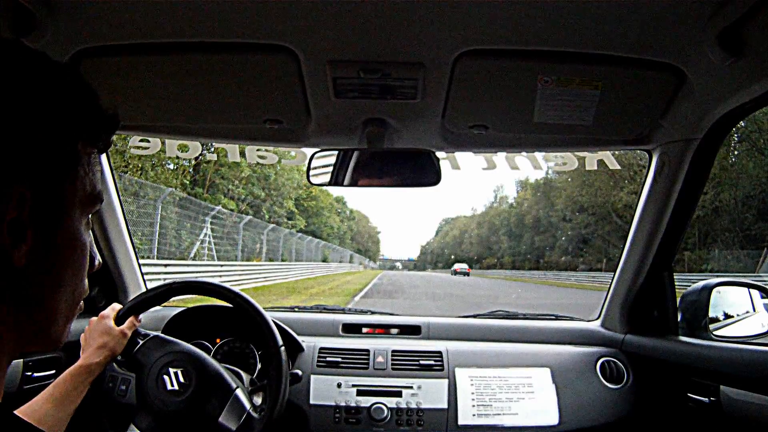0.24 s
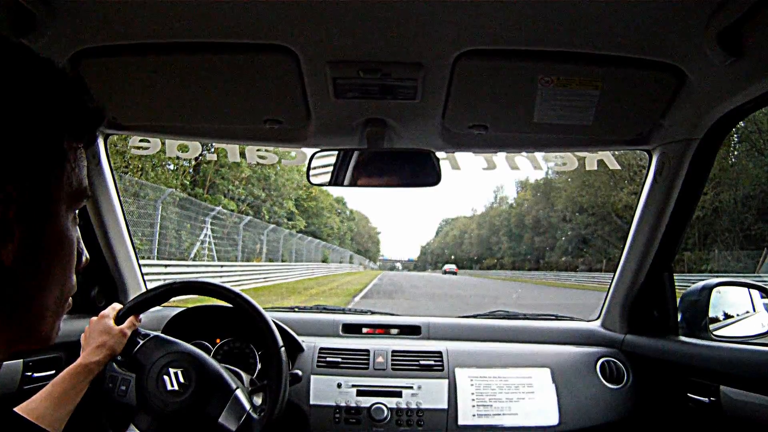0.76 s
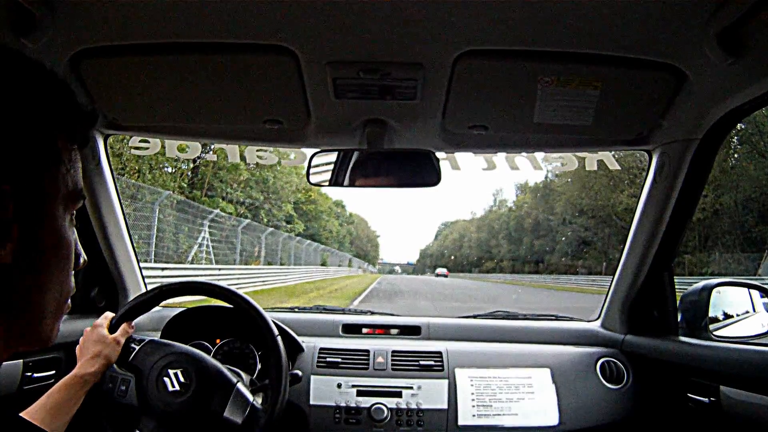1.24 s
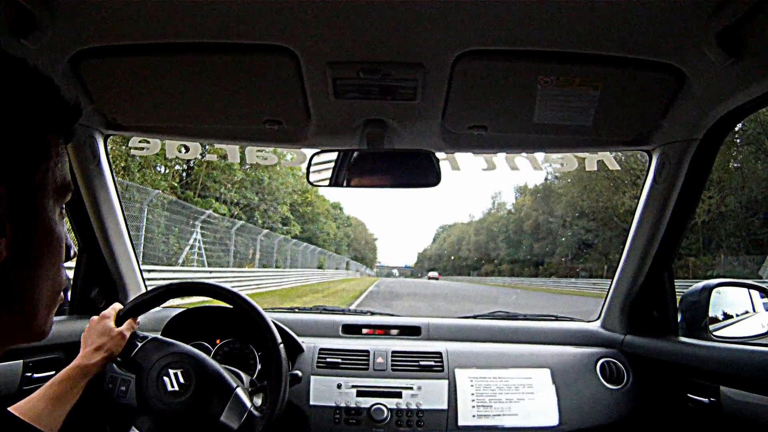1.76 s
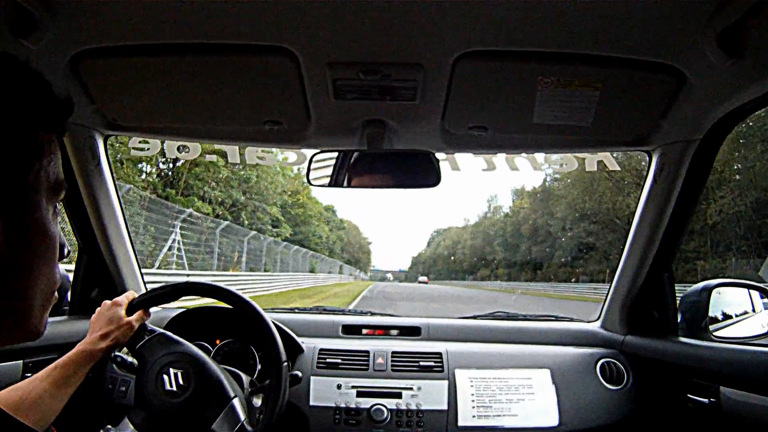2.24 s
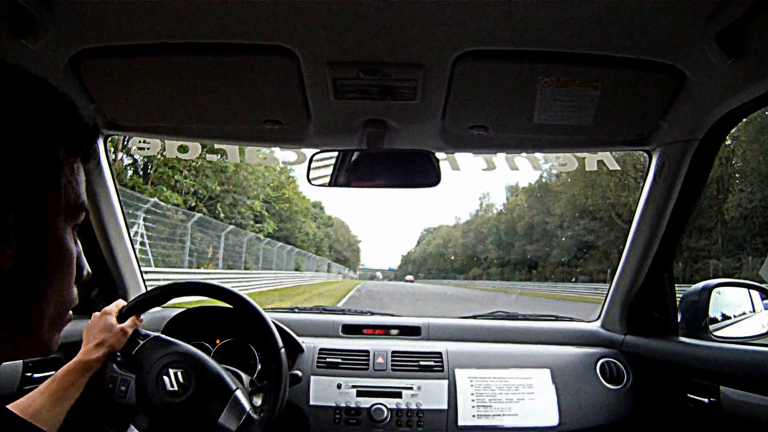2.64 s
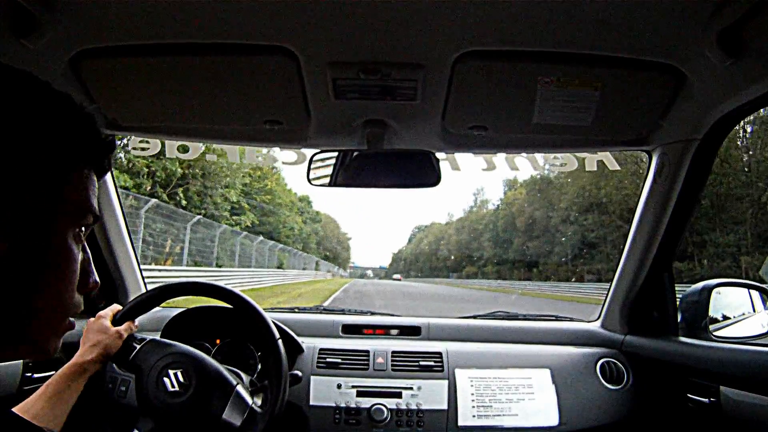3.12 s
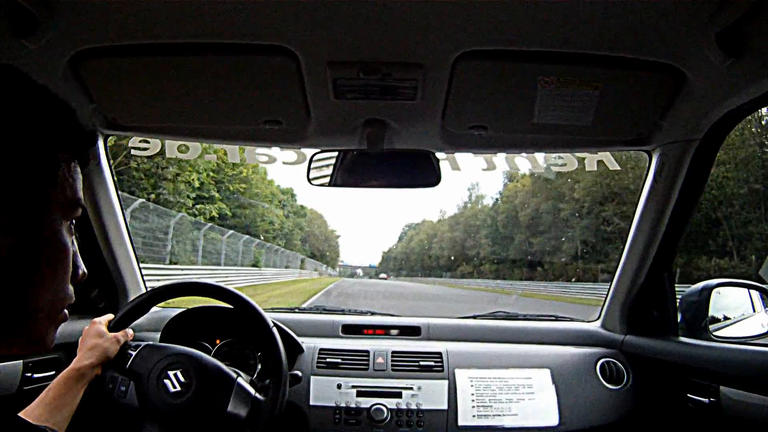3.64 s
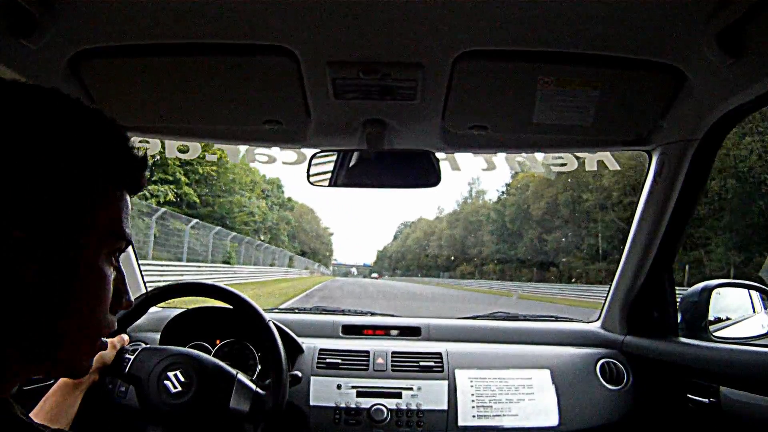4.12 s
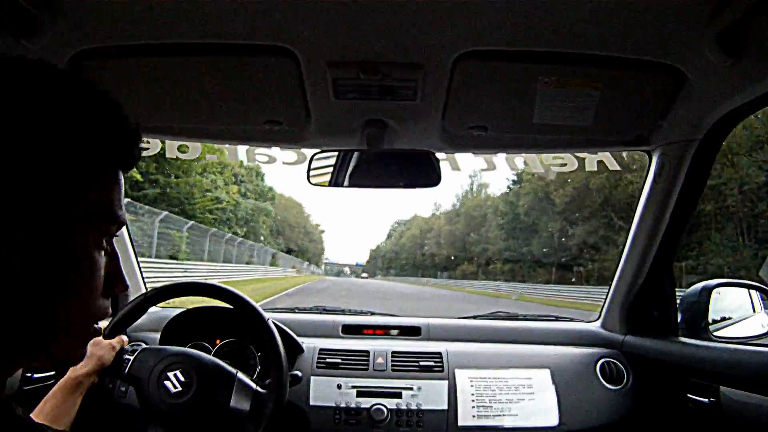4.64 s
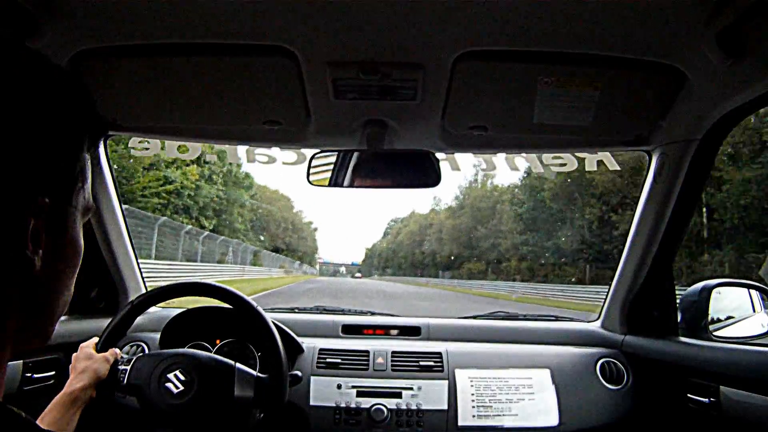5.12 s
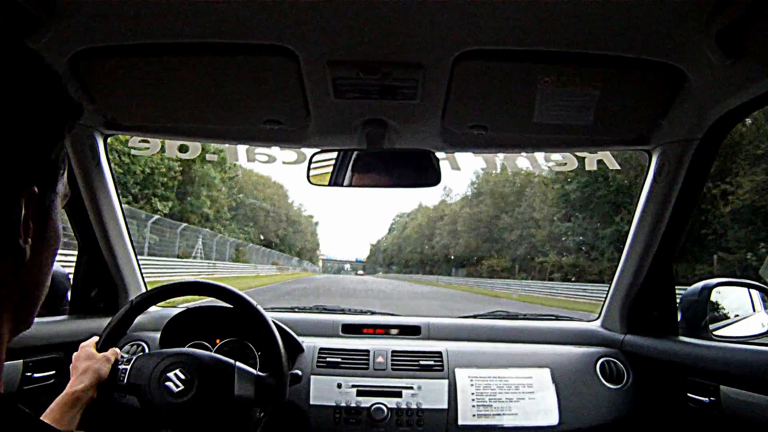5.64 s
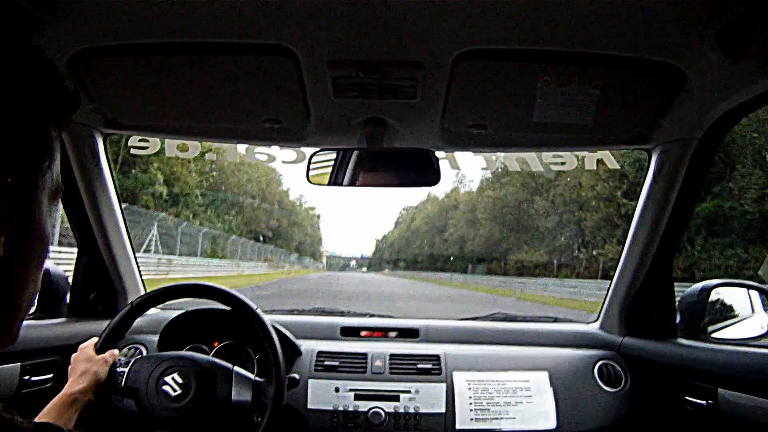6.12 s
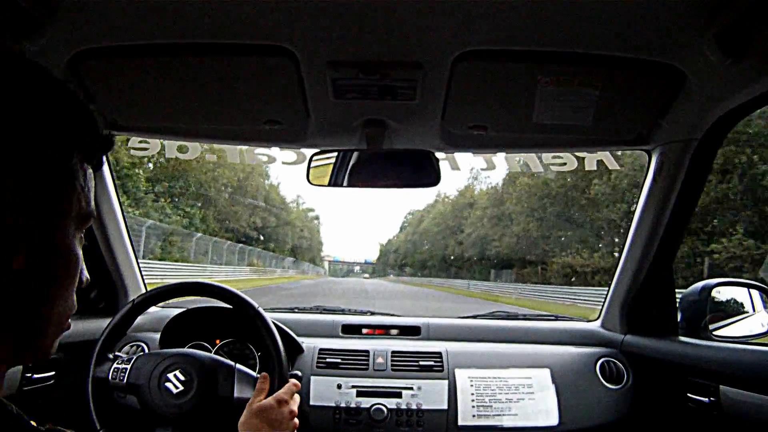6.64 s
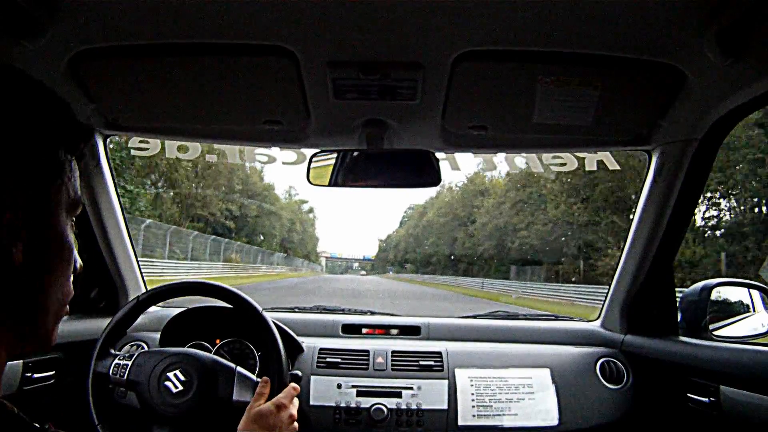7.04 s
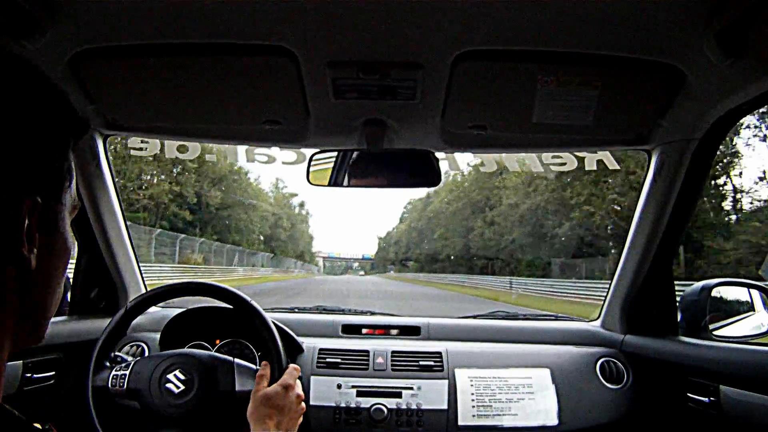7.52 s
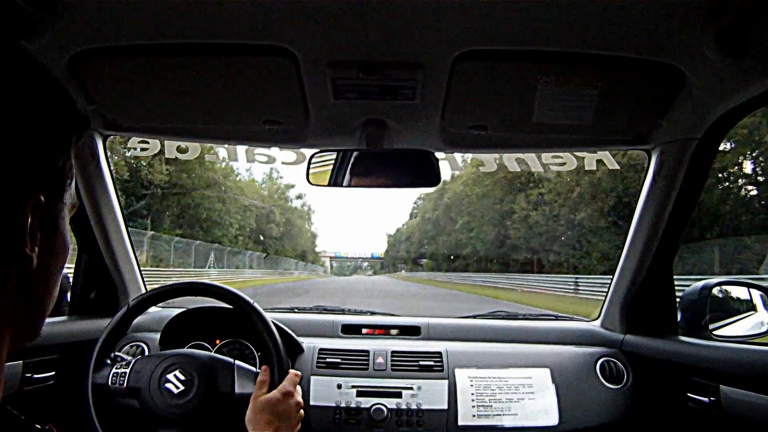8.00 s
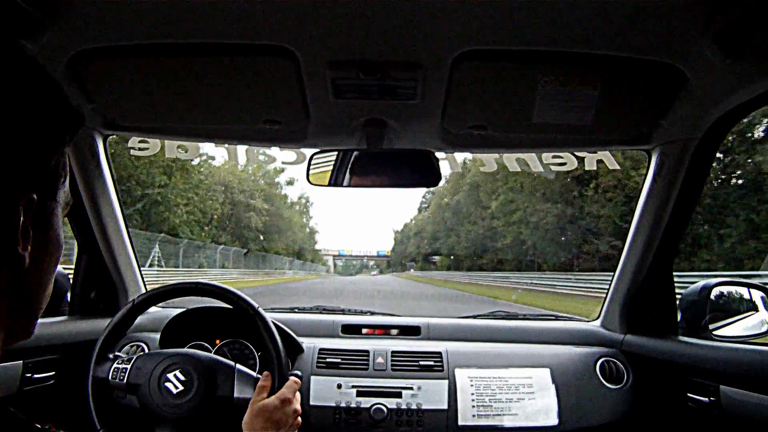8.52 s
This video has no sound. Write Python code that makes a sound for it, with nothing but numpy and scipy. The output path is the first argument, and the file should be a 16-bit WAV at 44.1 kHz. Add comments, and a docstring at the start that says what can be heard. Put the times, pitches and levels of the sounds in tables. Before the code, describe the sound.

From behind the front seats of a small car, a low idle is joined by dull knocks and two light pings. The engine revs up, dips for a moment, then accelerates in a long rising growl with rushing air and a slightly gritty edge. An upshift brings a clunk, clicks and a sudden fall in pitch before the revs build again more slowly. Uneven road rumble fills the closed cabin throughout.

```python
"""Inside a small four-cylinder car. First it idles, the controls thump and something small pings twice.
After a second it pulls away, the trim clicks, and the revs sag as the clutch bites. They climb until
5.7 s; near 6.3 s the car shifts up with a clunk, then pulls again. All along, the engine's firing note,
growl, rush of air and rasp swell and fade as the revs pass pitches at which the cabin rings, and the
road rumbles below. Holding each sample at a low rate adds a gritty treble."""
import sys
import numpy as np
from scipy import signal
from scipy.fft import rfft, irfft, next_fast_len
from scipy.io import wavfile
from scipy.ndimage import map_coordinates

SR = 44100
rng = np.random.default_rng(int(sys.argv[2]) if len(sys.argv) > 2 else 0)


def materialize(psi):
    """Save the field psi as 16-bit PCM at rate SR to the path in sys.argv[1].

    A 1-D psi becomes a single channel; in a 2-D psi each row is a channel.
    """
    bounded = np.clip(np.atleast_2d(psi).T, -1, 1)
    quanta = np.round(bounded * 32767).astype(np.int16)
    wavfile.write(sys.argv[1], SR, quanta)


N = 386757

# How often the cylinders fire, twice for each turn of the crankshaft: t/s, f/Hz
FIRING_RATE = [(0.0, 22.73), (1.07, 24.36), (1.65, 80), (2.01, 103.8), (2.2, 106.2), (2.38, 103.2),
               (2.8, 81.9), (3.01, 97.85), (3.75, 133.9), (4.92, 204.9), (5.21, 220.4), (5.67, 245.6),
               (5.9, 241.5), (6.17, 226.8), (6.3, 224.4), (6.4, 191.2), (6.58, 156.5), (6.7, 158.7),
               (7.77, 185.43), (8.77, 206.5)]
# How far the gas pedal is down: t/s, throttle/0-1
THROTTLE = [(0, 0), (.95, 0.21), (1.5, 0.42), (2.05, 0.73), (2.4, 0.72), (2.85, 0.84), (3.2, 0.9),
            (5.86, 0.95), (6.05, 0.51), (6.33, 0.73), (6.38, 0.02), (6.8, 0.74), (8.77, 0.79)]
# How loudly the cabin carries the firing note at full throttle: f/Hz, level/dB
NOTE_LEVEL = [(23, -25), (26, -5.5), (35, -9.5), (50, -11.5), (68, -9), (82, -18), (98, -17.5),
              (175, -13.5), (210, -11), (245, -17.5)]
# Firing rates at which the note cancels where the listener sits: f/Hz, width/Hz, level/dB
NOTE_DEAD_SPOTS = [(59.1, 6.2, -17.5), (130.5, 6.9, -7), (190.4, 3, -9.5), (204.1, 4.3, -8),
                   (217.8, 2.9, -11.5), (244, 1.9, -7.5)]
# The octave above the note, which turns slow firings into thuds: firing f/Hz, relative level/dB
THUD_OVERTONE = [(23, -25.5), (35, -7.5), (55, -12), (70, -17), (90, -25)]
# How well sound gets through the wall between engine and cabin: f/Hz, level/dB
ENGINE_WALL = [(20, -26), (60, -11.5), (100, -6), (130, 0.5), (260, -1), (390, -1), (550, -1.5), (700, -2),
               (810, -9.5), (1100, -11.5), (1350, -15), (2200, -32), (3000, -32)]
# Pitches at which the cabin rings: f/Hz, width/Hz, level/dB
CABIN_RESONANCES = [(175, 22, 2.5), (205, 21, 6.5), (294, 15, 3.5), (350, 41, 6.5), (389, 24, 6),
                    (447, 29, 6), (516, 33, 10), (607, 30, 4), (668, 34, 8.5), (723, 18, 7.5), (860, 34, 4),
                    (1075, 50, 4), (2015, 27, 6), (2203, 36, 8), (2662, 21, 7)]
# An "order" is a tone at a multiple of the crank's speed. Each takes its own route to the cabin,
# with its own peaks and notches: order, f/Hz, width/Hz, level/dB
ORDER_PEAKS = [(1, 95, 30, -9), (3, 260, 80, -4), (3, 358, 40, 8), (4, 208, 10, 4), (4, 282, 30, 11),
               (4, 330, 70, -10), (4, 432, 15, -9), (4, 468, 30, 5), (4.5, 439, 25, 6), (5, 333, 40, 7),
               (5, 450, 50, -6), (5.5, 490, 70, 9), (5.5, 600, 70, -4), (6, 305, 20, 10), (6, 460, 50, -6),
               (6, 515, 20, 3), (6, 550, 20, -6), (6, 620, 25, 8), (6.5, 554, 20, 10), (7, 360, 20, 10),
               (8, 290, 60, 5), (8, 730, 50, -9), (12, 503, 24, 12), (12, 590, 25, 7), (12, 645, 30, 6),
               (12, 735, 40, 6), (12, 1050, 200, -5)]
# Firing rates at which the engine runs harsher or smoother: f/Hz, width/Hz, relative level/dB
HARSHNESS = [(130.6, 18, 1.5), (154.6, 9, -2), (170.3, 6.38, 1.5), (182.4, 4.4, -1.5), (191.86, 2.667, 3.5),
             (210.2, 7.7, 2.5), (214.4, 7.9, -6), (218, 8.6, 3), (246.8, 5.2, 2.5)]
# Tone colour of the air being sucked in: f/Hz, level/dB
INTAKE_COLOUR = [(40, -33), (90, -9.5), (130, 2.5), (200, 4.5), (280, 0.5), (400, -3.5), (550, -1),
                 (690, -6), (800, -12.5), (1150, -21.5), (1500, -15), (2500, -47)]
# Tone colour of the valves' hiss: f/Hz, level/dB
VALVE_COLOUR = [(590, -30), (1000, -5.5), (1050, -2.5), (1180, -2.5), (1320, -12), (1480, -12), (1780, -12),
                (2150, -6.5), (2490, -10.5), (2960, -5), (3640, -18.5), (4940, -18.5), (5900, -27.5),
                (7670, -71), (13000, -120)]
# Whine of the timing drive, which turns the camshaft: order, relative level/dB
WHINE_ORDERS = [(16.5, -21), (18, -12.5), (19, -24), (22, -13), (24, -17)]
# Brief dips in the level just after two jolts, most in the treble: t/s, strength (more negative is deeper)
JOLT_DIPS = [(1.205, -3), (6.355, -22.5)]
# Dull knocks of pedals, gear lever and drivetrain: t/s, peak level/dB, f/Hz, time to fade 60 dB/s
THUMPS = [(0.061, -19, 160, 0.19), (0.089, -18.5, 170, 0.054), (.535, -24, 155, 0.19),
          (0.569, -23.5, 154, 0.16), (0.628, -22.5, 196, 0.039), (0.66, -21, 232, 0.015),
          (0.684, -20.5, 62.5, 0.28), (0.725, -23, 160, 0.079), (6.306, -11.5, 93.1, 0.06),
          (6.313, -21, 834, 0.037), (6.322, -7, 43.7, 0.15), (6.356, -13, 21.77, 0.3)]
# Clicks of trim and gear linkage: t/s, peak level/dB, relative level of the crack/dB
CLICKS = [(1.1714, -36, 0), (1.1987, -35, 8), (2.9255, -18.5, -2), (2.9348, -20.5, -7), (3.3832, -29, 0),
          (6.1814, -18, 2), (6.3136, -8, -11), (6.3352, -12.5, 1), (6.3455, -19, -10), (6.4393, -34, 0),
          (6.6238, -30, 5)]
# Tones of the clicking plastic: f/Hz, level/dB, time to fade 60 dB/s
PLASTIC_MODES = [(1740, -6.5, 0.013), (2450, 9, 0.005), (2640, -9, 0.073), (2900, 4.5, 0.018),
                 (4860, -18, 0.061)]
# Two bright pings: t/s, peak level/dB
PINGS = [(0.646, -21), (.951, -20.5)]
# Tones of the small hard thing that pings: f/Hz, level/dB, time to fade 60 dB/s
PING_MODES = [(2160, -10, 0.083), (2400, -13.5, 0.11), (2530, -18, 0.061), (2880, 0.5, 0.2),
              (2880, -3, 0.084), (3330, -21, 0.22), (3190, 3.5, 0.11), (3040, -2.5, .11),
              (3520, -30, 0.075), (3920, -25, 0.11)]
# How hard the road shakes the body: t/s, relative level/dB
ROAD_SHAKE = [(0, -29), (1, -29.5), (2.1, -29.5), (2.68, -23.5), (2.95, -25), (4.1, -20), (4.8, -28.5),
              (6.2, -24), (7.4, -23.5), (8.2, -22.5), (8.77, -23)]
# Tone colour of that shaking: f/Hz, level/dB
ROAD_COLOUR = [(8, -19.5), (18, -16), (28, 3.5), (40, -11.5), (55, -14), (80, -21), (150, -21), (300, -59)]


def firing_note(crank, crank_hz, throttle, load_db=10, third_harmonic_db=-6):
    """Two firings a turn make the main note; at low revs it sharpens into separate thuds."""
    firing_hz, angle = 2 * crank_hz, 2 * crank
    level_db = along(NOTE_LEVEL, firing_hz) + load_db * (throttle - 1)
    level_db += 1.5 * wobble(25) + 0.14 * wobble(5.7) + 0.38 * dips_db()
    note = amp(peaks(NOTE_DEAD_SPOTS, firing_hz)) * np.cos(angle)
    overtones = np.cos(2 * angle) + amp(third_harmonic_db) * np.cos(3 * angle)
    thud = amp(along(THUD_OVERTONE, firing_hz)) * overtones
    return np.sqrt(2) * amp(level_db) * (note + thud)


def cylinder_growl(crank, crank_hz, throttle, gain_db=-37, load_db=17, tilt_db=-2.5, uneven_db=3.5):
    """Unequal cylinders sound every half order; each swells with throttle and where the cabin rings."""
    grid_hz = np.arange(SR // 8)
    path_db = along(ENGINE_WALL, grid_hz) + cabin_db(grid_hz)
    twisted = crank + .016 * wobble(70)  # uneven burning twists the crank and roughens high orders
    growl = np.zeros(N)
    for order in np.arange(2, 28) / 2:
        if order != 2:  # order 2 is the firing note
            route_db = peaks([row[1:] for row in ORDER_PEAKS if row[0] == order], grid_hz)
            # Whole orders are a little stronger, even ones much stronger.
            source_db = tilt_db * np.log2(order) + (order % 1 == 0) + 5.5 * (order % 2 == 0)
            heard_db = np.take(path_db + route_db, (order * crank_hz).astype(int), mode="clip")
            growl += amp(source_db + heard_db + uneven_db * wobble(8)) * tone(order * twisted)
    revs_db = 4 * np.log2(crank_hz / 60) + .8 * peaks(HARSHNESS, 2 * crank_hz)
    return amp(gain_db + load_db * (throttle - 1) + revs_db) * growl


def intake_rush(crank, crank_hz, throttle, gulp=0.23, gain_db=-43.5):
    """The engine gulps air once a firing, and the rush makes the cabin ring."""
    air = noise(lambda hz: along(INTAKE_COLOUR, hz) + 0.84 * cabin_db(hz))
    pulse = 1 + gulp * np.cos(2 * crank) + 0.13 * np.cos(crank / 2)
    drive_db = effort_db(crank_hz, throttle, revs_db=4.5, load_db=9, harsh=0.99)
    return amp(gain_db + drive_db + .5 * dips_db() + wobble(12)) * unit(air * pulse)


def valve_rasp(crank, crank_hz, throttle, gain_db=-58, whine_db_per_octave=17):
    """Metallic hiss pulses with each firing and camshaft turn; the timing drive whines at high revs."""
    hiss = noise(lambda hz: along(VALVE_COLOUR, hz) + 0.2 * cabin_db(hz))
    pulse = np.exp(0.03 * np.cos(2 * crank) + 0.046 * np.cos(crank / 2))
    rasp = unit(hiss * pulse)
    grid_hz = np.arange(SR // 8)
    lift_db = cabin_db(grid_hz)
    rise_db = whine_db_per_octave * np.log2(crank_hz / 120)
    for order, db in WHINE_ORDERS:
        ringing_db = np.interp(order * crank_hz, grid_hz, lift_db)
        rasp += amp(db + rise_db + ringing_db + 3.2 * wobble(14)) * tone(order * crank)
    drive_db = effort_db(crank_hz, throttle, revs_db=7.5, load_db=7, harsh=1.11)
    return amp(gain_db + drive_db + dips_db() + 1.13 * wobble(22)) * unit(rasp)


def effort_db(crank_hz, throttle, revs_db, load_db, harsh):
    """Engine noise grows with revs and throttle, and peaks at the harsh speeds."""
    return revs_db * crank_hz / 50 + load_db * throttle + harsh * peaks(HARSHNESS, 2 * crank_hz)


def dips_db(fall_s=.004, recovery_s=0.052):
    """The level drops quickly after a jolt and soon comes back."""
    total_db = np.zeros(N)
    for start, strength in JOLT_DIPS:
        age = np.maximum(np.arange(N) / SR - start, 0)
        total_db += strength * (1 - np.exp(-age / fall_s)) * np.exp(-age / recovery_s)
    return total_db


def cabin_db(hz):
    """The boost the cabin gives to pitches at which it rings."""
    return peaks(CABIN_RESONANCES, hz)


def control_thumps(t, rise_s=0.0013):
    """Pedals, lever and drivetrain knock: each is one dying tone with a little dull noise."""
    track = np.zeros(N)
    for start, db, hz, fade_s in THUMPS:
        body = np.sin(2 * np.pi * hz * t) + 0.094 * burst(t, 4, 620)
        add(track, start, body * 1000 ** (-t / fade_s) * (1 - np.exp(-t / rise_s)), db)
    return track


def trim_clicks(t, crack_s=0.0034):
    """Plastic gives a sharp crack and rings for a moment."""
    track = np.zeros(N)
    for start, db, crack_db in CLICKS:
        body = ring(PLASTIC_MODES, t)
        crack = amp(crack_db) * np.exp(-t / crack_s) * burst(t, 1, [3600, 5800], "band")
        add(track, start, body + crack, db)
    return track


def pings(t, rise_s=0.00073, tick_s=0.0069):
    """Something small and hard ticks, rings with a rattle and echoes round the cabin."""
    track = np.zeros(N)
    for start, db in PINGS:
        rattle = 1 + .5 * burst(t, 2, 160)
        body = rattle * ring(PING_MODES, t)
        tick = 0.21 * np.exp(-t / tick_s) * burst(t, 2, [1800, 5800], "band")
        ping = (body + tick) * (1 - np.exp(-t / rise_s))
        add(track, start, signal.fftconvolve(ping, cabin_echoes(t)), db)
    return track


def cabin_echoes(t, strength=0.9, fade_s=0.26, count=90):
    """Sound arrives directly, then bounces off the glass and trim."""
    echo = np.zeros(len(t))
    echo[rng.integers(SR // 400, SR // 14, count)] = rng.standard_normal(count)
    echo *= 1000 ** (-t / fade_s)
    return (t == 0) + strength * echo / np.linalg.norm(echo)


def road_rumble(gain_db=-1):
    """The road shakes the body in uneven lumps."""
    lumps = amp(wobble(7))
    rumble = noise(lambda hz: along(ROAD_COLOUR, hz))
    return amp(over_time(ROAD_SHAKE) + gain_db) * unit(rumble * lumps)


def faint_hiss(centre_hz=2900, width_hz=380, level_db=-58):
    """A steady, narrow hiss, heard when the engine is quiet."""
    return amp(level_db) * noise(lambda hz: -20 * np.log10(1 + (2 * (hz - centre_hz) / width_hz) ** 2))


def amp(db):
    """Turn decibels into a multiplier."""
    return np.exp(np.asarray(db) * (np.log(10) / 20))


def unit(x):
    """Scale to an average strength (rms) of 1."""
    return x / np.sqrt(np.mean(x ** 2) + 1e-20)


def along(points, hz):
    """Read between (f/Hz, value) points on a pitch scale."""
    f, values = np.transpose(points)
    return np.interp(np.log(hz + 1), np.log(f + 1), values)


def over_time(points):
    """Join (t/s, value) points into one value per sample."""
    return np.interp(np.arange(N) / SR, *np.transpose(points))


def peaks(rows, hz):
    """Add up peaks and notches, in dB."""
    return sum(db / (1 + (2 * (hz - centre) / width) ** 2) for centre, width, db in rows)


def wobble(rate):
    """A smooth curve through `rate` random values a second."""
    coarse = np.linspace(0, N, num=4000)
    values = rng.standard_normal(int(N * rate / SR) + 4)
    return np.interp(np.arange(N), coarse, map_coordinates(values, [coarse * rate / SR], mode="nearest"))


def filtered(x, response):
    """Multiply each frequency in x by response(hz)."""
    size = next_fast_len(N + SR // 2)
    return irfft(rfft(x, size) * response(np.fft.rfftfreq(size, 1 / SR)), size)[..., :N]


def noise(colour_db):
    """Noise of rms 1 with the given tone colour."""
    return unit(filtered(rng.standard_normal(N), lambda hz: amp(colour_db(hz))))


def burst(t, steepness, edge_hz, kind="low"):
    """A short piece of filtered noise of rms 1."""
    band = signal.butter(steepness, edge_hz, kind, fs=SR, output="sos")
    return unit(signal.sosfilt(band, rng.standard_normal(len(t))))


def tone(angle):
    """A sine of rms 1 with a random starting phase."""
    return np.sqrt(2) * np.sin((angle + 2 * np.pi * rng.random()).astype(np.float32))


def ring(modes, t):
    """The dying tones of a struck object."""
    return sum(amp(db) * 1000 ** (-t / fade_s) * np.sin(2 * np.pi * (hz * t + rng.random()))
               for hz, db, fade_s in modes)


def add(track, start_s, sound, peak_db):
    """Mix a sound into the track."""
    part = track[round(start_s * SR):][:len(sound)]
    part += amp(peak_db) * sound[:len(part)] / np.abs(sound).max()


def scene():
    """Everything meets at one spot behind the seats, the same in both channels."""
    crank_hz = over_time(FIRING_RATE) / 2 * (1 + .001 * wobble(30))
    crank = 2 * np.pi * np.cumsum(crank_hz) / SR  # the shaft's angle in radians
    throttle = over_time(THROTTLE)
    engine_parts = (firing_note, cylinder_growl, intake_rush, valve_rasp)
    engine = sum(part(crank, crank_hz, throttle) for part in engine_parts)
    background = road_rumble() + faint_hiss()
    t = np.arange(SR // 3) / SR  # seconds since a knock began
    knocks = control_thumps(t) + trim_clicks(t) + pings(t)
    return np.tile(engine + knocks + background, (2, 1))


def record(dry, hold_hz=12000, top_hz=15400):
    """Holding each sample mirrors the sound below half the hold rate up into the treble."""
    roll_off = [(4500, 0), (5300, -3), (5950, -13)]  # f/Hz, level/dB
    band = filtered(dry, lambda hz: amp(along(roll_off, hz)) * (hz < hold_hz / 2))
    mirrored = band * (1 + 2 * np.cos(2 * np.pi * hold_hz * np.arange(N) / SR))
    return filtered(mirrored, lambda hz: np.sinc(hz / hold_hz) * (hz < top_hz))


dry = scene()
out = record(dry)
materialize(out)
```